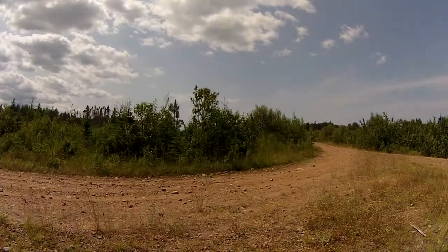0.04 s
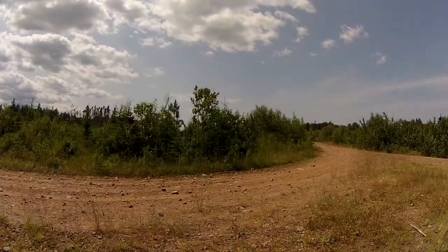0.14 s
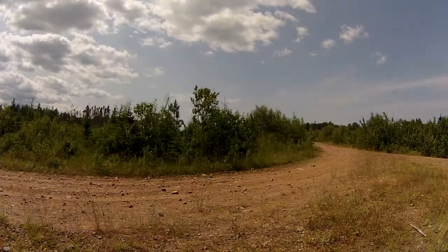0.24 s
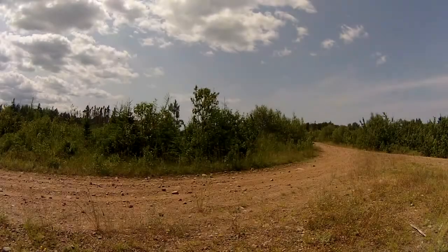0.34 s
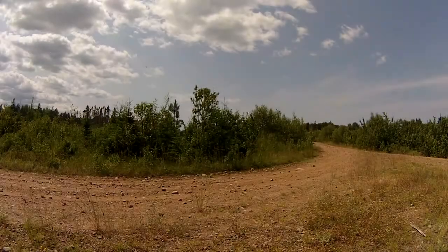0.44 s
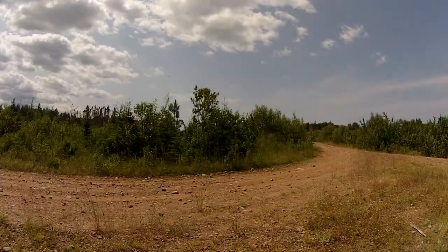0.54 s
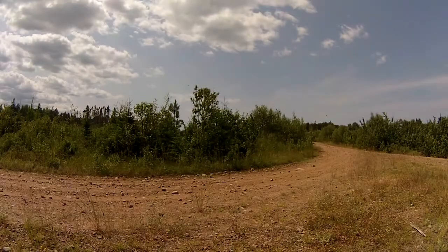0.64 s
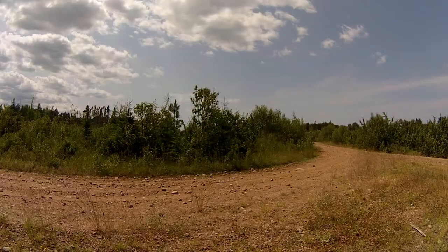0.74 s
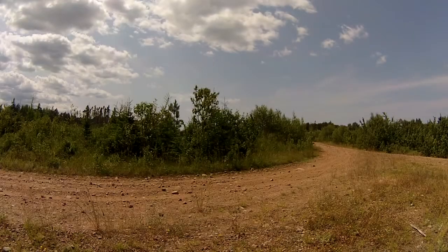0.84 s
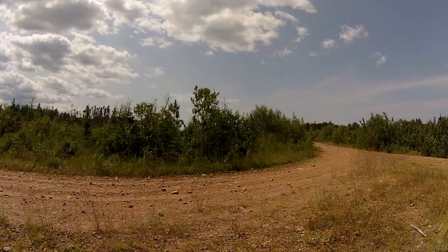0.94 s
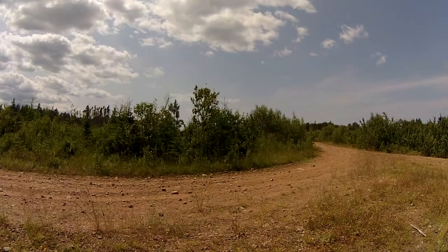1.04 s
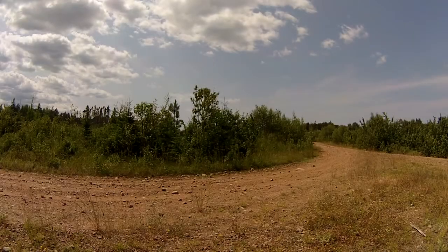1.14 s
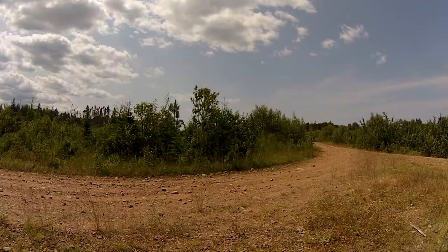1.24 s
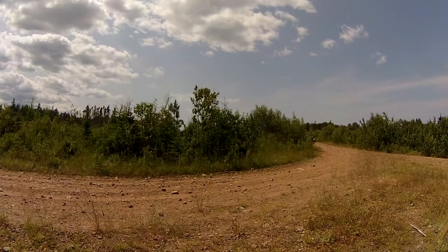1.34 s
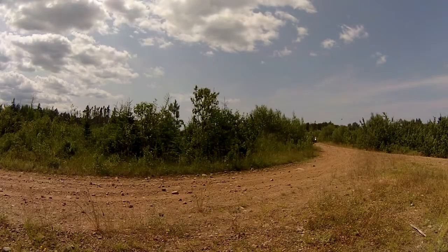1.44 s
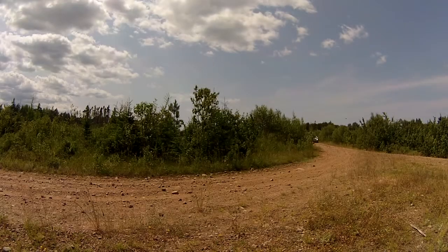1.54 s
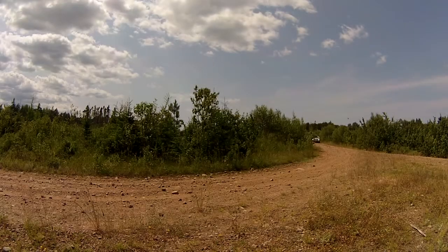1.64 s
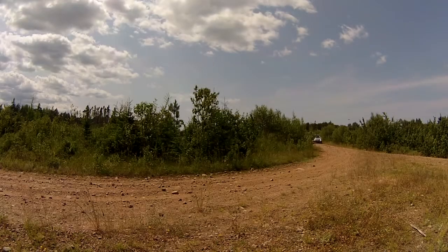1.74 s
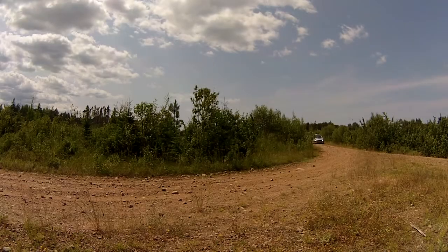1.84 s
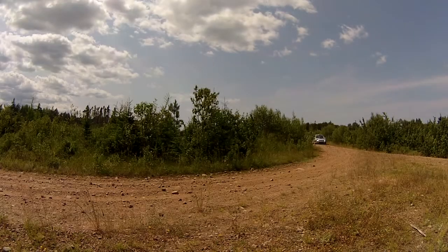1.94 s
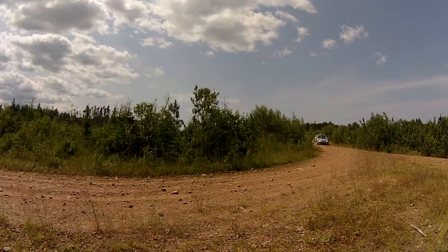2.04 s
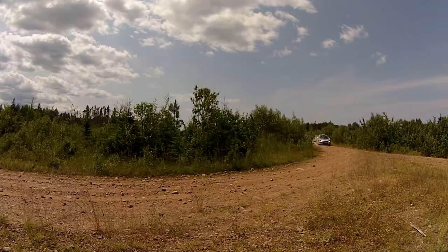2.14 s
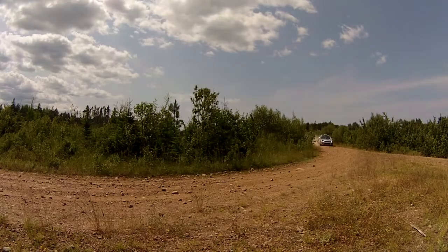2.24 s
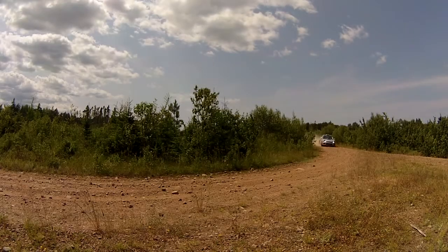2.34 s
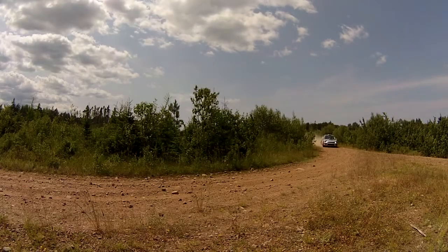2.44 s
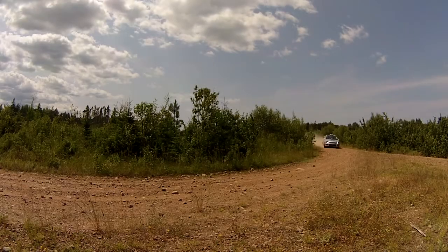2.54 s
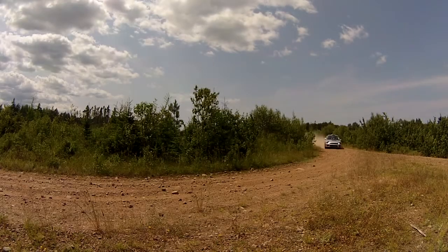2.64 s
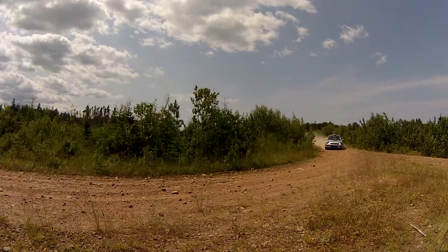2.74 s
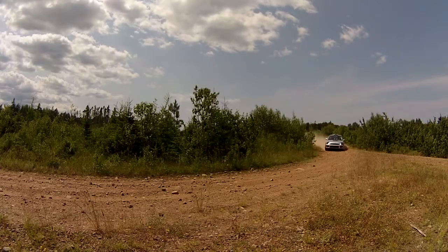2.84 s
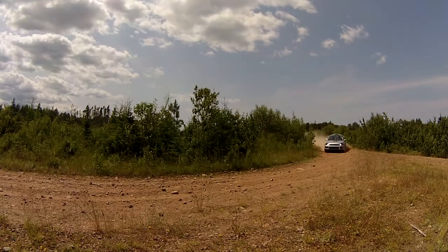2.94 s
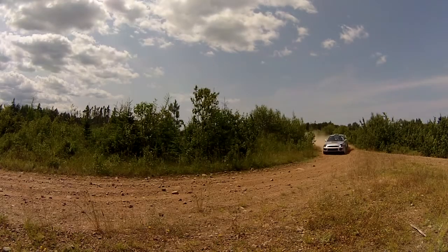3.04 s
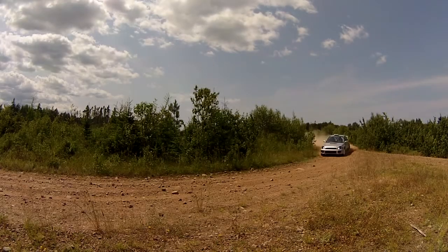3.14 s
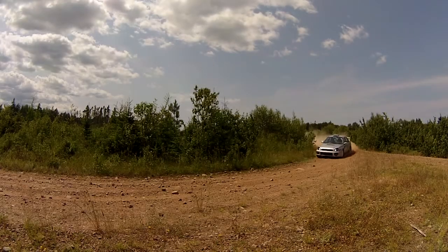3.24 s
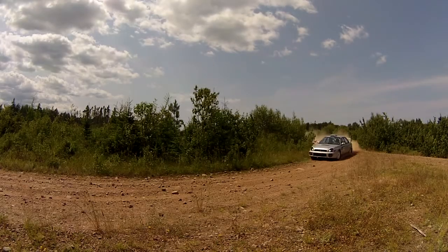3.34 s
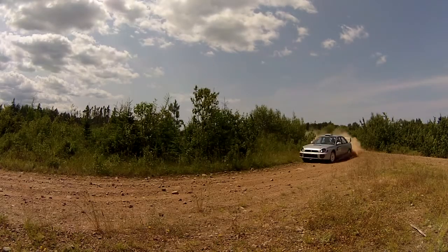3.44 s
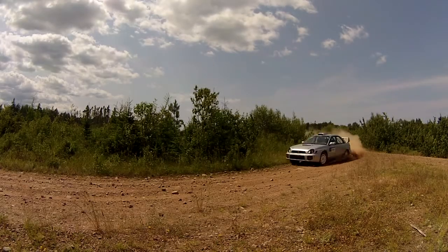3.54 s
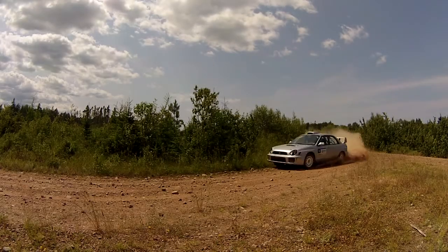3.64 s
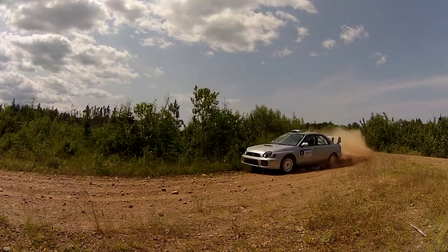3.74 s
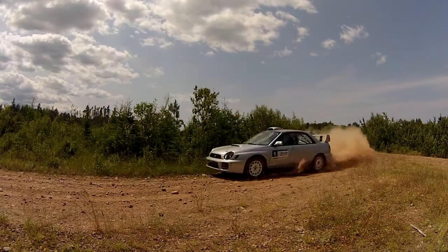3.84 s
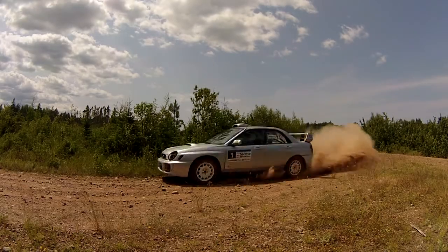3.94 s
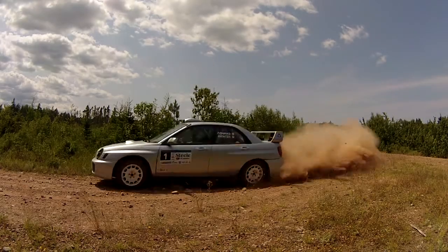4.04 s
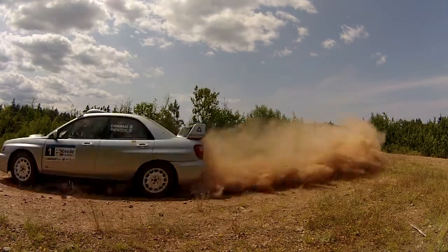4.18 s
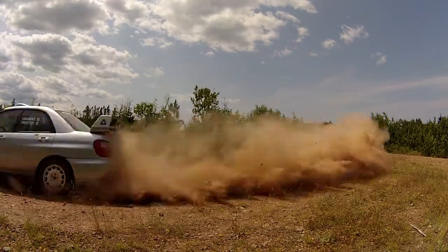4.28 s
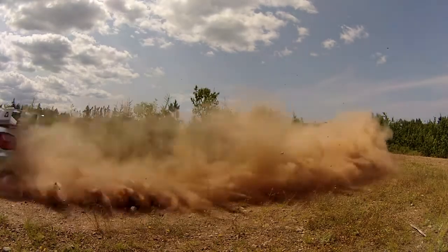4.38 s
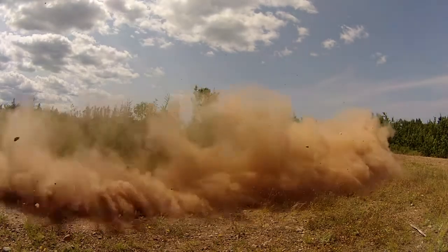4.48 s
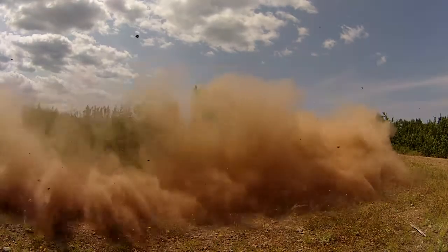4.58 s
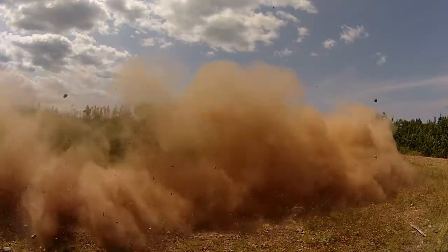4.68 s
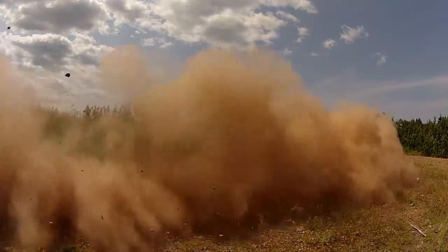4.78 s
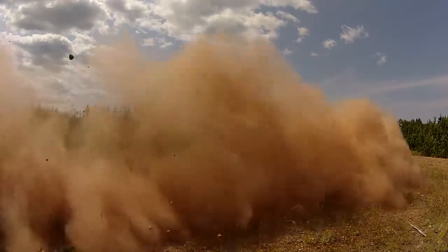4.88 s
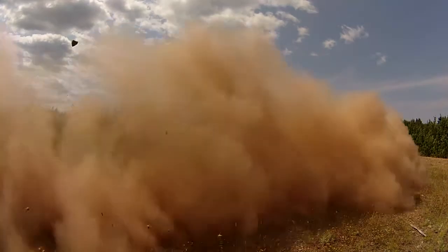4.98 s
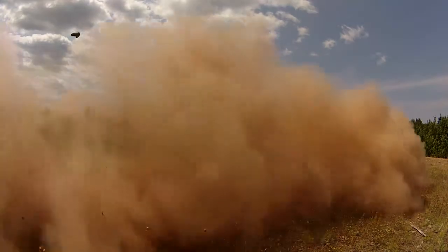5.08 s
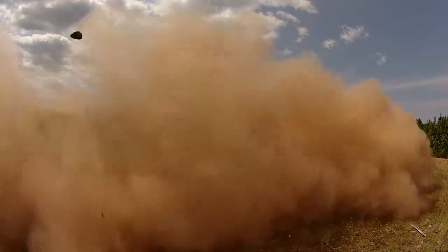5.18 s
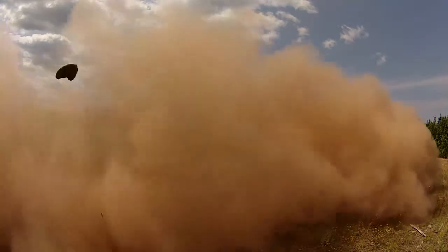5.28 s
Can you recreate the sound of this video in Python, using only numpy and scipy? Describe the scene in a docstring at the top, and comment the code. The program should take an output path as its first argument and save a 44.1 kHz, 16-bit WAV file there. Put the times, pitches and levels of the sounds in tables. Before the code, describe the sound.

An open-air dirt road, heard by a fixed roadside microphone with faint steady hiss. From 0 to 0.9 s a distant rally engine is quiet and droning, its pitch rising slightly. At about 0.9 s the throttle eases and the note sags lower until about 2 s, with soft tyre noise. From 2.6 s power returns: a rough, buzzing bark builds, and the first tiny stone clicks appear. Between 3 and 4 s it swells steeply, gravel crunching and spraying, stones pinging on the bodywork, with a brief throttle dip just before 4 s. At about 4.2 to 4.6 s the car rips past very close, a loud raspy exhaust roar with sharp cracks, heavy crunch and gravel spray, peaks distorting. The pitch drops slightly as it leaves. From 4.7 s the roar and gravel wash diminish, still strong, while thrown stones land in short sharp clicks until the end at 5.3 s.

```python
"""Rally car passing on gravel

A rally car comes closer on a gravel road, eases off, then powers past close by and away.
Low engine tones drone; four firings in each engine cycle make waves that steepen to a bark and a sharp crack.
Patchy filtered noise makes the tyre thumps, gravel crunch, spray and grit; short noise bursts with a ring
make the stones. A hiss and a faint tone lie underneath, and peaks above full scale are cut flat.
"""
import sys
import numpy as np
from scipy import signal
from scipy.fft import rfft, irfft, next_fast_len
from scipy.io import wavfile
from scipy.ndimage import uniform_filter1d, map_coordinates

SR = 44100
rng = np.random.default_rng(int(sys.argv[2]) if len(sys.argv) > 2 else 0)


def bounce(signal):
    """Save signal as a 16-bit WAV file at the path given by the first command-line argument."""
    frames = np.transpose(np.atleast_2d(signal))
    limited = np.clip(frames, -1, 1)
    pcm = np.round(limited * 32767).astype(np.int16)
    wavfile.write(sys.argv[1], SR, pcm)


def invert_db(level):
    """Linear amplitude ratio for a level in decibels (20 dB per decade), elementwise."""
    return 10 ** (np.asarray(level, dtype=float) / 20)


N = 234215  # length [samples]

# Recorder self-noise, shape only: (frequency [Hz], relative level [dB per Hz])
HISS_SPECTRUM = [(1760, -14), (3000, -14.5), (4320, -26), (6020, -26.5), (9890, -28), (10200, -28),
                 (14500, -29), (15600, -39.5)]
# Faint steady electronic tone: (frequency [Hz], level before a fixed lift [dB])
FAINT_TONE = [(10519, -85.5)]

# Road sounds: (time [s], tyre thumps [dB], crunch before a fixed lift [dB], gravel spray [dB], fine grit [dB])
ROAD_LEVELS = [(0, -68, -64.5, -63.5, -79.5), (.71, -70, -62, -60.5, -76.5), (1.4, -64, -57.5, -65.5, -79),
               (2.47, -58, -53.5, -61, -72), (2.72, -47, -48, -56.5, -74), (3.03, -62, -45, -50, -67.5),
               (3.2, -54, -39.5, -49.5, -65.5), (3.5, -47, -41.5, -44.5, -61.5),
               (3.68, -41, -35, -40.5, -57), (3.85, -40, -33.5, -39.5, -57), (4.18, -32, -25.5, -32, -47.5),
               (4.36, -33, -27.5, -35.5, -51.5), (4.46, -35, -23.5, -34, -49.5),
               (4.62, -46.5, -28.5, -33.5, -55), (4.87, -49.5, -34, -38.5, -55.5),
               (5.31, -54.5, -35.5, -41.5, -57.5)]
# Shapes of the four road noises: (frequency [Hz], relative level [dB per Hz])
THUMP_SPECTRUM = [(20, -37.5), (45, -4.5), (80, -4.5), (130, -13), (250, -12), (600, -70.5)]
CRUNCH_SPECTRUM = [(60, -27), (120, 2), (250, 4), (500, 0), (900, -4.5), (1500, -15), (2500, -40.5),
                   (5000, -54)]
SPRAY_SPECTRUM = [(500, -24.5), (1200, 5.5), (1800, 2), (2700, -3.5), (4200, -4), (5500, -17), (7000, -32),
                  (10000, -48.5)]
GRIT_SPECTRUM = [(2940, -19.5), (5000, -5.5), (6500, -14), (8240, -14), (9240, -18.5), (12500, -16.5),
                 (15600, -33)]

# Stones striking the car body and the verge:
# (time [s], level before the fade [dB], ring [Hz], low thud gain [dB], high tick gain [dB])
STONE_HITS = [(2.6995, -47, 2980, 5, -26), (2.7423, -43, 4500, -14, -23), (2.813, -54.5, 3550, 11, -29),
              (2.891, -52.5, 2640, -8, -4.5), (3.2011, -36, 3550, -8, -34), (3.3, -33, 2530, -1, -30),
              (3.3038, -32, 4150, -5, -35), (3.31, -38, 5300, -3, -48), (3.423, -42, 3270, -8, -12),
              (3.682, -28.5, 2300, -8, -17.5), (3.705, -27, 2400, -1, -21), (3.884, -31, 2330, -13, -10),
              (3.9351, -21, 4340, -2.5, -36), (4.1448, -19, 3000, -1.5, -15), (4.88, -19, 2660, 1, -39.5),
              (4.8854, -35, 2544, -10, -13.5), (4.911, -31, 3190, -15, -8.5), (4.979, -20, 4030, -1, -36),
              (5.0383, -18, 3520, -6.5, -40.5), (5.0606, -27.5, 3140, -13, -35.5),
              (5.102, -24, 2620, -20, -19), (5.138, -30, 3180, -1, -14), (5.1954, -29.5, 3500, -5, -14)]
BODY_T60_S, LANDING_T60_S = 0.034, 0.013  # 60 dB fade: on the car body; thrown stones landing close by
STONE_RING = 0.58  # size of the ring beside the crack

# Engine speed: (time [s], engine cycles per second as heard [Hz])
ENGINE_SPEED = [(0, 36.3), (.18, 37.9), (.5, 40.4), (.87, 42.0), (1.01, 38.9), (1.14, 40.1), (1.3, 38.8),
                (1.39, 37.5), (2.0, 31.0), (2.35, 31.8), (2.65, 31.8), (2.97, 33.7), (3.15, 36.2),
                (3.3, 36.2), (3.42, 37.3), (3.53, 36.7), (3.71, 37.7), (3.8, 37.1), (3.87, 38.1),
                (3.96, 40.3), (4.06, 37.5), (4.11, 37.1), (4.27, 38.3), (4.44, 35.3), (4.54, 35.1),
                (4.72, 34.2), (4.84, 34.8), (4.9, 34.6), (5.15, 35.3), (5.2, 35.2), (5.31, 35.7)]
# Engine tones at 3, 4 (firing) and 5 times the cycle rate, before flutter, and bark at full throttle:
# (time [s], third [dB], fourth [dB], fifth [dB], bark [dB])
ENGINE_LEVELS = [(0, -77.5, -68, -60.5, -51.5), (.45, -75, -61, -59.5, -56), (.75, -72, -54.5, -62, -52.5),
                 (.9, -62, -56.5, -64, -52.5), (1.05, -64.5, -50.5, -59.5, -75),
                 (1.55, -55, -56, -53.5, -65), (1.9, -55, -54, -50.5, -50), (2.3, -64, -50.5, -47.5, -46),
                 (2.56, -54, -45, -53, -47), (2.65, -62, -58, -41.5, -39.5), (2.8, -60, -48, -40.5, -41.5),
                 (3.0, -68, -57, -39.5, -34.5), (3.2, -48, -49, -40.5, -35), (3.36, -58, -47, -39.5, -30),
                 (3.56, -57, -32, -33, -27), (3.86, -43, -24.5, -38, -22), (3.96, -33, -39, -29.5, -22.5),
                 (4.1, -44, -18.5, -26, -16.5), (4.22, -38, -25.5, -34, -12), (4.3, -38, -17.5, -21, -11.5),
                 (4.54, -31, -21, -20.5, -9), (4.72, -36.5, -23.5, -26, -14),
                 (5.01, -46, -26.5, -32, -16.5), (5.31, -46, -30.5, -34.5, -21.5)]
# Throttle: (time [s], opening [0-1])
THROTTLE_OPENING = [(0, 1), (.92, 1), (.96, .3), (1.4, .2), (1.9, 0), (2.55, 0), (2.75, .4), (3.1, .6),
                    (3.4, 1), (3.93, 1), (3.98, .7), (4.05, 1), (5.31, 1)]
# How steep the pressure wave gets, limited again in use: (time [s], steepness [0-1])
WAVE_STEEPNESS = [(0, 0.8), (.4, 0.38), (.9, 0.2), (2.6, 0.9), (3.7, 0.71), (4.25, 0.81), (4.4, .92),
                  (4.6, 0.92), (4.75, 0.78), (5.31, 0.79)]
# Uneven manifold wave that every firing carries: (multiple of the cycle rate, relative level [dB])
MANIFOLD_WAVE = [(3, -19), (4, 0), (5, -6.5), (6, -18)]
# Colour of the exhaust pipe and tail: (frequency [Hz], relative gain [dB])
PIPE_FILTER = [(40, -30), (200, -8), (250, 2), (285, 10), (330, 4), (430, 0), (560, 1), (700, -2),
               (850, -4), (1000, -4), (1300, 0), (1600, -3), (2200, -14), (4000, -32), (16000, -66)]
# Colour of the steep front leaving the tail pipe: (frequency [Hz], relative gain [dB])
TAIL_FILTER = [(500, -17.5), (1100, 1), (1600, 0), (2300, -2.5), (3200, -2), (4200, -8), (5500, -19.5),
               (8000, -27), (12000, -32.5), (16000, -33.5)]
SEVENTH_DB, SEVENTH_LIFT_DB = -17, 16.5  # seventh order beside the fifth; extra with the throttle shut
WEAK_FLUTTER_DB = 3  # the third and seventh orders come and go
START_TURN = 0.25  # part of the engine cycle already done at 0 s
DRONE_LEAD = 0.23  # phase by which the drone's tones run ahead of the firing phase [rad]
LIFT_DB = 11  # bark lost with the throttle shut
CRACK_DB, FACING_DB = -26, 17  # crack beside the bark; gain when the tail pipe points at the microphone
FACING_S, FACING_HALF_S = 4.394, 0.28  # middle and half length of that moment [s]


def unit(x):
    """Scale to rms 1."""
    return x / np.sqrt(np.mean(x ** 2) + 1e-20)


def steady(x):
    """Divide out the slow level, so that the rms stays near 1."""
    power = np.abs(uniform_filter1d(x ** 2, size=SR // 8))
    return x / np.sqrt(power + 1e-12)


def along(points, hz):
    """Read (frequency, value) points on a log frequency axis."""
    f, v = np.transpose(points)
    return np.interp(np.log(hz + 1), np.log(f + 1), v)


def curves(rows):
    """Give one value per sample for each column after the time."""
    s, *cols = np.transpose(rows)
    return [np.interp(np.arange(N) / SR, s, c) for c in cols]


def wobble(rate):
    """Make a smooth random curve with this many random points a second (400 at most)."""
    points = rng.standard_normal(N // 100)
    return map_coordinates(points, [np.arange(N) * min(rate, 400) / SR])


def coloured(x, spectrum):
    """Filter x with this (frequency, dB) shape, without any sound ahead of its cause."""
    m = 2 * next_fast_len(N // 2 + 4096)
    gain = invert_db(along(spectrum, np.fft.rfftfreq(m, 1 / SR)))
    # folding the cepstrum onto positive times makes the filter minimum phase
    cepstrum = irfft(np.log(gain + 1e-6), m)
    cepstrum[1:m // 2] *= 2
    cepstrum[m // 2 + 1:] = 0
    return irfft(rfft(x, m) * np.exp(rfft(cepstrum)), m)[:N]


def rush(spectrum, patchy_db, grains, spread_db):
    """Noise of rms 1 in random patches, with a share of single grains of uneven size."""
    size = invert_db(spread_db * rng.exponential(size=N)) * (rng.random(N) < 0.03)
    grain = unit(size * rng.standard_normal(N))
    z = signal.stft(rng.standard_normal(N) + grains * grain, nperseg=512)[2]
    # smooth the random patches over frequency, then over time
    field = uniform_filter1d(rng.standard_normal(z.shape), size=6, axis=0)
    field = uniform_filter1d(field, size=10, axis=1)
    patchy = signal.istft(z * invert_db(patchy_db * unit(field)), nperseg=512)[1][:N]
    return unit(coloured(patchy, spectrum))


def self_noise():
    """The recorder's own steady hiss, with a faint high electronic tone."""
    t = np.arange(N) / SR
    hiss = invert_db(-67.5) * unit(coloured(rng.standard_normal(N), HISS_SPECTRUM))
    tone = sum(invert_db(db + 3.5) * np.sin(2 * np.pi * hz * t) for hz, db in FAINT_TONE)
    return hiss + tone


def road():
    """Tyres thump and crunch on the loose surface and throw gravel and grit, heard as grainy noise."""
    thump_db, crunch_db, spray_db, grit_db = curves(ROAD_LEVELS)
    surge = wobble(9)  # shared by crunch, spray and grit
    thump = rush(THUMP_SPECTRUM, patchy_db=1.2, grains=0.1, spread_db=2.5)
    crunch = rush(CRUNCH_SPECTRUM, patchy_db=2.13, grains=0.25, spread_db=2.0)
    spray = rush(SPRAY_SPECTRUM, patchy_db=1.5, grains=0.77, spread_db=2.5)
    grit = rush(GRIT_SPECTRUM, patchy_db=1.5, grains=0.5, spread_db=2.5)
    thump = invert_db(thump_db + 0.8 * wobble(6)) * thump
    crunch = invert_db(crunch_db + 4.0 + 0.11 * surge) * crunch
    spray = invert_db(spray_db + 1.2 * surge) * spray
    grit = invert_db(grit_db + 1.5 * surge) * grit
    return thump + crunch + spray + grit


def stones():
    """Each stone gives a short crack with a thud below, a tick above and a brief ring."""
    out = np.zeros(N + SR)
    t = np.arange(SR // 10) / SR
    edges = (900, 2200), (2200, 5500), (6000, 14000)  # thud, crack, tick [Hz]
    bands = [signal.butter(4, edge, "band", fs=SR, output="sos") for edge in edges]
    for s, db, hz, thud_db, tick_db in STONE_HITS:
        t60 = BODY_T60_S if s < FACING_S else LANDING_T60_S
        thud, crack, tick = (unit(signal.sosfilt(b, rng.standard_normal(len(t)))) for b in bands)
        ring = STONE_RING * np.sin(2 * np.pi * hz * t)
        hit = 0.43 * crack + ring + invert_db(thud_db) * thud + invert_db(tick_db) * tick
        rise = 1 - np.exp(-30 * t / t60)
        out[round(s * SR):][:len(t)] += invert_db(db - 60 * t / t60) * rise * hit
    return out[:N]


def engine_drone(turn, throttle):
    """Low tones at 3, 4, 5 and 7 times the cycle rate, each wandering a little in level and phase."""
    third_db, fourth_db, fifth_db, _ = curves(ENGINE_LEVELS)
    third_db = third_db + WEAK_FLUTTER_DB * wobble(14)
    seventh_db = fifth_db + SEVENTH_DB + SEVENTH_LIFT_DB * (1 - throttle) ** 3
    seventh_db = seventh_db + WEAK_FLUTTER_DB * wobble(13)
    drone = np.zeros(N)
    for order, db in zip((3, 4, 5, 7), (third_db, fourth_db, fifth_db, seventh_db)):
        phase = order * turn + DRONE_LEAD + 0.1 * wobble(25)
        drone += invert_db(db + 3 + wobble(25)) * np.cos(phase)  # 3 dB from rms to peak
    return drone


def exhaust_bark(turn):
    """Crests overtake troughs in the pipe, which adds sum tones above every multiple of the firing rate."""
    steep = np.clip(curves(WAVE_STEEPNESS)[0], 0.1, 0.92)
    firing = np.exp(4j * turn)
    wave = np.zeros(N, complex)
    for order, db in MANIFOLD_WAVE:
        phase = order * turn - 0.8 + 0.08 * wobble(25)
        wave += invert_db(db + 0.7 * wobble(25)) * np.exp(1j * phase)
    return steady(coloured(np.real(wave / (1 - steep * firing) * firing), PIPE_FILTER))


def exhaust_crack(turn):
    """Each firing leaves the tail pipe as a sharp front followed by a puff of turbulent gas."""
    firing = np.exp(4j * turn)
    shock = np.real(firing / (1 - 0.985 * firing))
    strength = invert_db(3.5 * np.cos(turn - 1.1) + 1.7 * wobble(150))  # uneven from firing to firing
    since_crest = 2 * turn / np.pi % 1  # part of the firing gone by
    gust = np.exp(-since_crest / 0.48)
    puff = 10 * gust * uniform_filter1d(rng.standard_normal(N), size=6)
    return steady(coloured(strength * (shock + puff), TAIL_FILTER))


def exhaust():
    """Drone, bark and crack follow one engine rotation; the throttle strengthens bark and crack."""
    cycle_hz, = curves(ENGINE_SPEED)
    throttle, = curves(THROTTLE_OPENING)
    bark_db = curves(ENGINE_LEVELS)[3]
    turn = 2 * np.pi * (START_TURN + np.cumsum(cycle_hz) / SR) + 0.007 * wobble(60)
    facing = np.exp(-((np.arange(N) / SR - FACING_S) / FACING_HALF_S) ** 2)
    crack_db = bark_db + CRACK_DB + FACING_DB * facing
    drone = engine_drone(turn, throttle)
    bark = invert_db(bark_db - LIFT_DB * (1 - throttle)) * exhaust_bark(turn)
    crack = invert_db(crack_db) * throttle * exhaust_crack(turn)
    return drone + bark + crack


def scene():
    """Road, stones and exhaust added together at the microphone, in one channel."""
    return (road() + stones() + exhaust())[None]


def roll_off(x):
    """The treble ends steeply here."""
    return signal.sosfilt(signal.butter(12, 15740, fs=SR, output="sos"), x)


def record(dry):
    """Add the recorder's self-noise, then cut peaks flat just under full scale, as in a hard overload."""
    mix = np.clip(dry + self_noise(), -0.98, 0.98)
    return roll_off(mix)


dry = scene()
out = record(dry)
bounce(out)
```